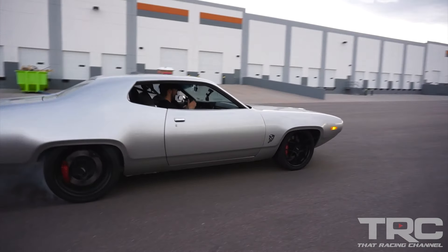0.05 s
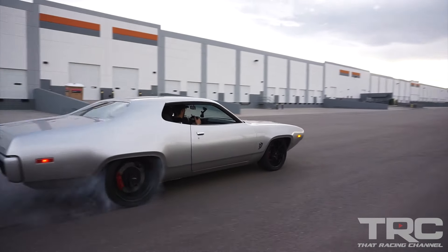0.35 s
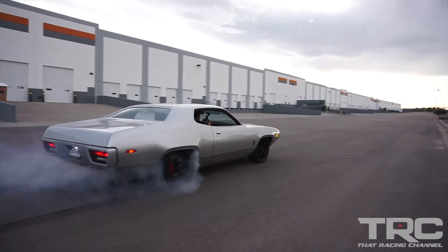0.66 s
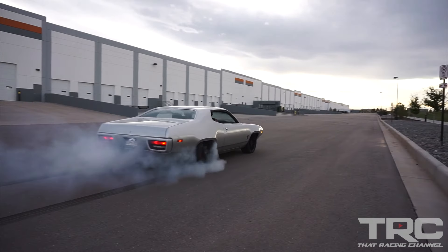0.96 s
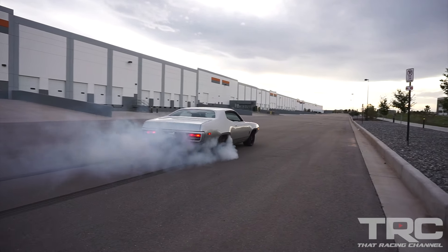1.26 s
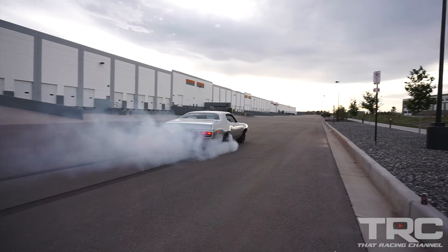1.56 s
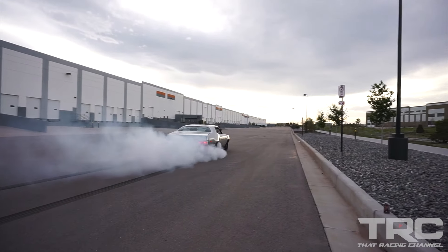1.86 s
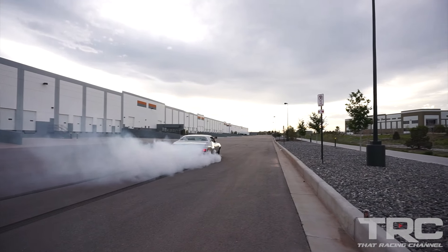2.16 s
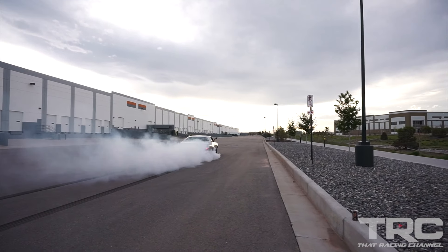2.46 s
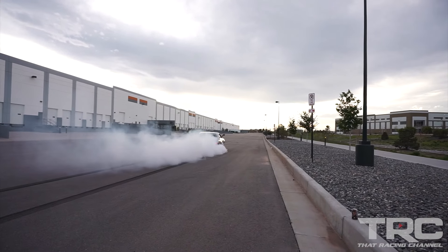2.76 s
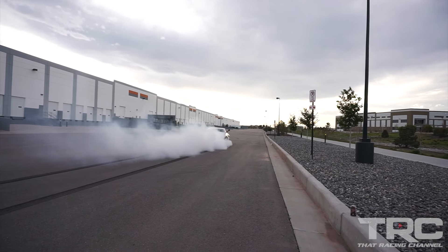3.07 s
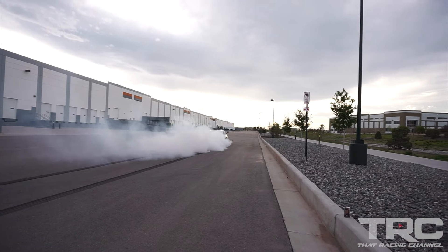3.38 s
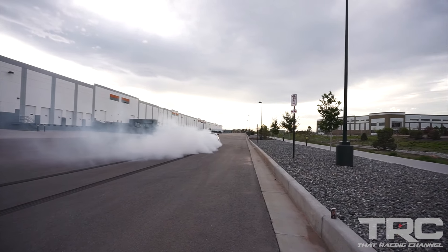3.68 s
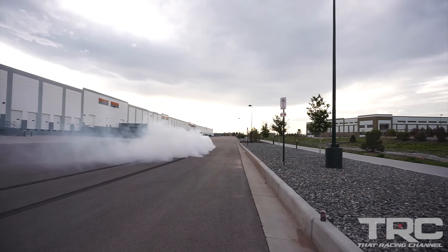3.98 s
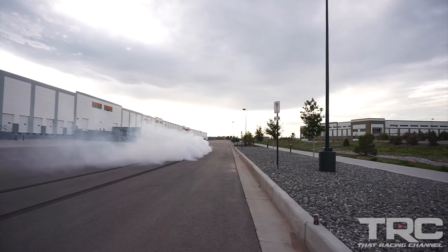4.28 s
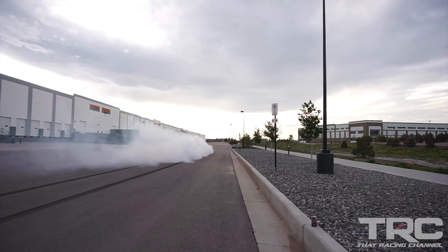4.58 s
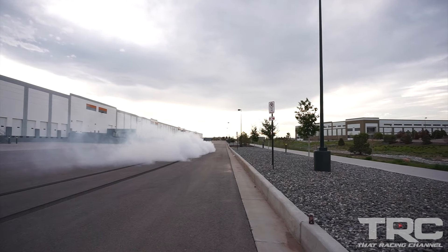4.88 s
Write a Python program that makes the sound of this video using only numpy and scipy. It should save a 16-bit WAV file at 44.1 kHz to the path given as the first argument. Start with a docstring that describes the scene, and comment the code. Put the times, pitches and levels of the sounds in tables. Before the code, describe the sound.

High tire squeal from a rolling burnout stutters, softens with distance, screeches again and stops, over a faint engine and small wind puffs.

```python
"""Rolling burnout on an open lot.

A car passes and moves away beside a long warehouse wall. Its spinning tyres scrub the asphalt, and
stick-slip friction makes them sing near 1.8 kHz; now and then the tread locks into a loud screech.
The engine's firing note is faint underneath, and turbulent puffs of wind buffet the microphone."""
import sys
import numpy as np
from scipy import signal
from scipy.fft import rfft, irfft
from scipy.io import wavfile
from scipy.ndimage import uniform_filter1d, minimum_filter1d, map_coordinates

SR = 44100
rng = np.random.default_rng(int(sys.argv[2]) if len(sys.argv) > 2 else 0)


def waveform_to_disk(signal):
    """Save audio, clipped to [-1, 1], as 16-bit WAV at the path in sys.argv[1]."""
    frames = np.transpose(np.atleast_2d(signal))
    scaled = np.clip(frames, -1, 1) * 32767
    samples = np.round(scaled).astype(np.int16)
    wavfile.write(sys.argv[1], SR, samples)


N = 222130
T = np.arange(N) / SR
HZ = np.fft.rfftfreq(N, 1 / SR)


def gain_of(db):
    """Amplitude ratio of a level in decibels."""
    return 10 ** (np.asarray(db) / 20)


def unit_rms(x):
    """Normalisation to unit mean power."""
    return x / np.sqrt(np.mean(abs(x) ** 2) + 1e-20)


def curve(rows):
    """Linear interpolation of each column over time."""
    times, *columns = np.transpose(rows)
    return [np.interp(T, times, c) for c in columns]


def spectrum(rows):
    """Interpolation of each column over log frequency."""
    hz, *columns = np.transpose(rows)
    return [np.interp(np.log(HZ + 1), np.log(hz), c) for c in columns]


def wander(rate_hz):
    """Low-pass Gaussian fluctuation of unit rms."""
    return unit_rms(irfft(rfft(rng.standard_normal(N)) * np.exp(-(HZ / rate_hz) ** 2), N))


def phase_of(hz):
    """Phase as the integral of frequency."""
    return 2 * np.pi * np.cumsum(hz) / SR


def panned(balance_db):
    """Constant-power gains for a left-minus-right level difference."""
    gains = gain_of(np.array([balance_db, -balance_db]) / 2)
    return gains / np.sqrt(np.mean(gains ** 2, axis=0))


def port_noise(colour, ports):
    """Partial coherence: spectra of one coloured noise at the two microphone ports."""
    coherence, lead, balance = spectrum(ports)
    coherence = np.clip(coherence, 0, 1)
    left, independent = rfft(rng.standard_normal((2, N)))
    right = (coherence * left + np.sqrt(1 - coherence ** 2) * independent) * np.exp(-1j * lead)
    return np.array([left, right]) * panned(balance) * gain_of(spectrum(colour)[0])


def puff_envelope(start_s, decay_s, attack_s=.004):
    """A pressure transient: linear rise, exponential decay."""
    rise = np.clip((T - start_s) / attack_s + 1, 0, 1)
    return rise * np.exp(-np.maximum(T - start_s - attack_s, 0) / decay_s)


# Strong eddies: start_s, level_db, decay_s
STRONG_PUFFS = [(1.611, -30, .011), (1.677, -30.5, .016), (2.428, -23, .009), (2.571, -21, .011),
                (2.605, -32, .025), (3.028, -20.5, .012), (3.061, -23, .009), (3.751, -21, .006),
                (3.78, -36, .05), (4.332, -35, .016), (4.383, -33, .02), (4.535, -27, .012),
                (4.766, -27.5, .008)]

def puffs(flow_db, wake_db=-18, wake_s=.055, flurries_per_s=9, flurry_s=.009):
    """Intermittency of turbulence: the envelope of strong puffs, their wakes and random flurries."""
    strong = sum(gain_of(db) * np.hypot(puff_envelope(s, decay),
                                        gain_of(wake_db) * puff_envelope(s, wake_s))
                 for s, db, decay in STRONG_PUFFS)
    flurries = sum(puff_envelope(s, flurry_s) for s in T[rng.random(N) < flurries_per_s / SR])
    return strong + flurries * gain_of(np.minimum(flow_db, -44) + 5)  # capped: clearest in light wind


# Steady airflow: time_s, relative_level_db
AIRFLOW = [(0, -71), (1, -58), (1.55, -56), (1.9, -64), (2.3, -61), (2.7, -47), (4.25, -45), (4.45, -36.5),
           (4.73, -40.5), (4.93, -25.5), (5.04, -36)]
# Buffeting spectrum: frequency_hz, relative_density_db
BUFFET_COLOUR = [(20, -32), (50, -17), (100, -3.5), (200, 0.5), (330, 0.5), (550, -4.5), (800, -10.5),
                 (1300, -21), (2500, -41), (5000, -63), (10000, -72)]
# Wind at the two ports: frequency_hz, coherence, left_lead_rad, balance_db
WIND_COHERENCE = [(50, 1, 0.42, -3), (150, 1, 1.05, -1), (307, 0.6, 1.76, 0), (806, 0.58, 2.5, -0.5),
                  (3000, .2, 1.4, 2)]

def wind(lumpy_db=2.5, snap_hz=340, crackle_db=2):
    """Turbulent pressure: eddies break on the ports, the puffs brighter than the steady flow."""
    flow_db = curve(AIRFLOW)[0]
    flow = unit_rms(irfft(port_noise(BUFFET_COLOUR, WIND_COHERENCE), N) * gain_of(lumpy_db * wander(40)))
    eddies = irfft(port_noise(BUFFET_COLOUR, WIND_COHERENCE) * HZ / np.hypot(HZ, snap_hz), N)
    eddies *= gain_of(crackle_db * wander(150))
    eddies /= np.sqrt(uniform_filter1d((eddies ** 2).mean(0), size=500))
    air = flow * gain_of(flow_db - 1) + eddies * puffs(flow_db)
    return signal.sosfilt(signal.butter(2, 45, "highpass", fs=SR, output="sos"), air)


# Engine running: time_s, firing_rate_hz, relative_level_db
FIRING = [(0, 205, -59.5), (.55, 200, -62), (.85, 216, -50.5), (1.2, 222, -57.5), (2.2, 215, -62),
          (3.6, 212, -49.5), (5.04, 205, -58)]
# Exhaust spectrum: frequency_hz, relative_density_db
EXHAUST_COLOUR = [(25, -45.5), (60, -25), (120, 0), (220, 11), (330, 7.5), (480, -17.5), (900, -42.5)]
# Exhaust and tyre noise at the two ports: frequency_hz, coherence, left_lead_rad, balance_db
CAR_COHERENCE = [(600, .88, -.2, 1.5), (1780, 1, -.35, .5), (3500, .78, .5, 3), (5000, .65, .4, 9.5),
                 (7000, .6, .1, 4.5), (10000, .55, .1, 8)]

def engine(note_db=-5, orders_db=-11):
    """Periodic firing: eight cylinders, four a revolution, give a note and crank orders in rumble."""
    hz, level = curve(FIRING)
    phase = phase_of(hz * (1 + .021 * wander(22)))
    orders = sum(np.cos(k * phase / 4 + wander(12)) for k in range(2, 9))
    note = unit_rms(np.cos(phase) + gain_of(orders_db) * orders)
    rumble = unit_rms(irfft(port_noise(EXHAUST_COLOUR, CAR_COHERENCE), N))
    return (rumble + gain_of(note_db) * note) * gain_of(level)


# Scrubbing effort, with wheelspin ending near 4.3 s: time_s, effort_db
SCRUB_EFFORT = [(0, -2.5), (.33, 2), (.58, -3), (.98, 1), (1.4, -1.3), (2.9, .3), (3.35, -2), (3.85, -1),
                (4.05, -4), (4.25, -5), (4.38, -13), (5.04, -11)]
# Friction spectrum: frequency_hz, relative_density_db
FRICTION_COLOUR = [(30, -70.5), (200, -50), (490, -22), (570, -7), (800, -6), (1100, -2), (1550, 0.5),
                   (2300, 0.5), (2800, -2), (3700, -5.5), (4600, -10), (6500, -17.5), (11000, -24)]
# Its peaks and hollows: centre_hz, width_hz, gain_db
FRICTION_RIPPLE = [(1130, 80, 3), (1330, 70, -4), (2180, 90, -5), (2420, 130, 2), (2800, 130, -3),
                   (3150, 160, 2), (4400, 160, -2), (5200, 450, -1.5)]
# Bands of rub, rasp and sizzle: low_hz, high_hz
FRICTION_BANDS = [(750, 1250), (2400, 2950), (5800, 10500)]
# Strength of each band: level_db, growth_db_per_effort_db, loss_db_per_s
FRICTION_LEVELS = [(-39.8, 1.2, 0), (-34.3, .8, 6.1), (-38.7, 1.3, 10.2)]

def scrubbing(recede_s=1.55, grit_db=1, flutter_db=.93):
    """Sliding friction: torn rubber and grit hiss; distance and smoke attenuate the treble first."""
    ripple = sum(db * np.exp(-.5 * ((HZ - hz) / width) ** 2) for hz, width, db in FRICTION_RIPPLE)
    noise = port_noise(FRICTION_COLOUR, CAR_COHERENCE) * gain_of(ripple)
    centres = np.log(FRICTION_BANDS).mean(1)
    effort = curve(SCRUB_EFFORT)[0]
    receding_s = np.maximum(T - recede_s, 0)
    hiss = np.zeros((2, N))
    for (low, high), (db, growth, loss), share in zip(FRICTION_BANDS, FRICTION_LEVELS, np.eye(3)):
        level = db + growth * effort - loss * receding_s
        band_rms = irfft(noise * ((HZ > low) & (HZ < high)), N).std()
        crossover = np.interp(np.log(HZ + 1), centres, share)
        hiss += irfft(noise * crossover, N) / band_rms * gain_of(level)
    return hiss * gain_of(grit_db * wander(230) + flutter_db * wander(36))


def resonance(width_hz, hold_s=.032):
    """Random excitation: the complex envelope of a resonance, whose bandwidth grows as it runs faster."""
    step = 1 / 32
    clock = np.cumsum(width_hz * np.ones(N)) / SR
    kicks = rng.standard_normal((N, 2)) @ [1, 1j]
    poles = np.full(3, np.exp(-np.pi * step))
    ring = unit_rms(signal.lfilter([1], np.poly(poles), kicks))
    ring = np.interp(clock / step + 500, np.arange(N), ring)
    # friction limits the swing, steadying the loudness
    window = np.exp(-np.linspace(-2, 2, round(hold_s * 2 * SR)) ** 2)
    return unit_rms(ring / np.sqrt(signal.fftconvolve(abs(ring) ** 2, window, "same")))


# Left-minus-right level of the squeal: time_s, balance_db
SQUEAL_BALANCE = [(0, 7.5), (.48, 7), (.8, 1.5), (3.4, .5), (3.56, -2.5), (4.3, 0), (4.37, 16), (4.58, 15),
                  (4.85, 2)]

def at_ports(tone, lead_rad, balance_share=1):
    """Phase and level differences turn a complex tone into a stereo pair of equal mean power."""
    pair = np.sqrt(2) * np.array([tone, tone * np.exp(-1j * lead_rad)]).real
    return pair * panned(balance_share * curve(SQUEAL_BALANCE)[0])


# Weaker resonance of the tread: time_s, pitch_hz, relative_level_db
SECOND_MODE = [(.1, 2020, -48), (.33, 2093, -23), (.8, 2180, -28.5), (1.4, 2120, -37), (1.6, 1650, -39),
               (2.9, 1497, -33), (3.2, 1440, -42), (4, 1447, -46), (4.4, 1450, -66)]

def second_voice():
    """Beating: another part of the tread sings against the main note, first above it, then below."""
    hz, level = curve(SECOND_MODE)
    tone = resonance(width_hz=240) * np.exp(1j * phase_of(hz))
    return at_ports(tone, lead_rad=-.2) * gain_of(level - 1)


# Main stick-slip resonance: time_s, pitch_hz, relative_level_db
MAIN_MODE = [(0, 1700, -25), (.5, 1870, -26.5), (.72, 1950, -24.5), (.95, 1965, -20), (1.4, 1940, -21.2),
             (1.8, 1875, -22), (2.08, 1840, -28), (2.52, 1830, -27.7), (2.8, 1710, -31.5),
             (3.2, 1815, -28.3), (3.45, 1770, -29), (3.65, 1730, -26), (3.98, 1670, -23),
             (4.33, 1715, -29.5), (4.55, 1715, -31.5), (4.68, 1715, -46), (5.04, 1740, -55)]
# Its bandwidth, narrow when the blocks slip in step: time_s, width_hz
MODE_WIDTH = [(0, 480), (.5, 400), (.85, 280), (2.7, 455), (3.7, 280), (4.4, 170), (5, 260)]

def singing(octave_db=-22, flutter_db=2):
    """Incoherent stick-slip: many tread blocks slip out of step and feed one gliding resonance."""
    hz, level = curve(MAIN_MODE)
    tone = resonance(curve(MODE_WIDTH)[0]) * np.exp(1j * phase_of(hz))
    tone *= gain_of(flutter_db * wander(40))
    tone = unit_rms(tone) + gain_of(octave_db) * unit_rms(tone ** 2)
    return at_ports(tone, lead_rad=-.31) * gain_of(level - 3)


# Spectrum of tearing rubber: frequency_hz, relative_density_db
TEARING_COLOUR = [(700, -40), (1300, -12), (1600, -2), (2100, 0), (2700, -11), (3800, -10), (4500, -26),
                  (7000, -45), (11000, -70)]

def tearing(envelope, treble_db):
    """Fracture noise: rubber tears while the tread holds, a rasp on each screech, weaker far away."""
    rasp = unit_rms(irfft(port_noise(TEARING_COLOUR, CAR_COHERENCE), N))
    return rasp * envelope * gain_of(-17 + .8 * treble_db)


# One screech a row: start_s, end_s, relative_level_db, pitch_hz, glide_hz, relative_octave_db
TREAD_GRABS = [(0, .045, -15.5, 1632, 80, -16), (.056, .215, -15.3, 1720, 15, -9),
               (.259, .303, -15.4, 1695, -50, -5), (.315, .456, -16.2, 1785, 20, -4.5),
               (.464, .506, -14, 1771, -15, -3.5), (.566, .587, -16, 1900, 110, -4.5),
               (.634, .658, -13.8, 1890, 100, -10), (.775, .802, -14.2, 1990, -45, -19),
               (.954, .988, -17.5, 1920, 65, -24), (1.018, 1.074, -17, 1940, 0, -14),
               (1.27, 1.306, -15.5, 1900, 10, -15), (1.424, 1.442, -12, 1935, 70, -24),
               (3.541, 3.645, -18.6, 1690, 0, -12), (3.98, 4.009, -15, 1655, -20, -21),
               (4.022, 4.097, -14.5, 1638, 0, -15), (4.156, 4.177, -23.5, 1726, 0, -6),
               (4.199, 4.299, -18, 1640, -90, -12)]

def grip(attack_s=.011, release_s=.007, surge_hz=26.5, slack_depth=.55, pitch_lift=.02):
    """Modulation by grip: each screech surges evenly, weaker and sharper as the grip slackens."""
    envelope, slack, knots = np.zeros(N), np.zeros(N), []
    for start, end, db, hz, glide, octave_db in TREAD_GRABS:
        surges = max(round((end - start) * surge_hz), 1)
        turns = np.clip(surges * (T - start) / (end - start), .5, surges - .5)
        slack += np.cos(np.pi * turns) ** 8
        rise = np.clip((T - start) / attack_s + .5, 0, 1)
        release = np.clip((end - T) / release_s + .5, 0, 1)
        envelope += gain_of(db) * rise * release
        knots += [(start, hz - glide / 2, octave_db), (end, hz + glide / 2, octave_db)]
    hz, octave_db = curve(knots)
    return envelope * (1 - slack_depth * slack), hz * (1 + pitch_lift * slack), octave_db


# Screech timbre as the distance changes: time_s, rasp_share, treble_gain_db, fuzz_db
SCREECH_TIMBRE = [(0, .032, 0, -1), (.4, .05, 0, -4), (.65, .058, 2.5, 0), (1.4, .03, -3, -2),
                  (4.3, .02, -6.5, 0)]

def screeches(jitter=.016, throb_db=1.4, block_hz=310, block_depth=.08, ribs_db=-9):
    """Self-excited oscillation: the tread locks into one harmonic tone, roughened by passing blocks."""
    envelope, hz, octave_db = grip()
    rasp, treble_db, fuzz_db = curve(SCREECH_TIMBRE)
    block_phase = phase_of(block_hz * (1 + .12 * wander(78.9)))
    phase = phase_of(hz * (1 + jitter * wander(82.3)))
    # single slips come early or late without moving the pitch
    slip = rasp * hz / block_hz * wander(450)
    # the swing sags at times but cannot outgrow the rubber's grip
    sag = gain_of(-throb_db * wander(55) ** 2)
    swing = unit_rms(sag * (1 + block_depth * np.cos(block_phase)))
    # neighbouring ribs sing slightly apart and beat
    ribs = unit_rms(1 + gain_of(ribs_db) * resonance(width_hz=300))
    tone = at_ports(ribs * np.exp(1j * (phase + slip)), lead_rad=-.3)
    fuzz = gain_of(fuzz_db)
    for k, db in [(2, treble_db / 2), (3, treble_db - 15), (4, 2 * treble_db - 21)]:
        # a clean core in a fuzz from blocks that fall out of step
        body = (1 + fuzz * resonance(width_hz=270 * k)) / np.hypot(1, fuzz)
        overtone = at_ports(body * np.exp(1j * k * phase), lead_rad=.5, balance_share=.5)
        tone += gain_of(octave_db + db) * overtone
    return swing * (tone * envelope * gain_of(.9) + tearing(envelope, treble_db))


def lot_reflections(x, wet_db=-20.5, t60_s=.68, first_s=.023, echoes_per_s=1500):
    """Reverberation: wall and asphalt scatter a thin, exponentially decaying tail."""
    t = T[:SR]
    taps = rng.standard_normal((2, SR)) * (rng.random((2, SR)) < echoes_per_s / SR)
    taps *= gain_of(-60 * t / t60_s) * (t > first_s)
    tail = signal.lfilter(*signal.butter(1, 3000, fs=SR), taps)
    tail /= np.linalg.norm(tail, axis=1, keepdims=True)
    return x + gain_of(wet_db) * signal.fftconvolve(x, tail, axes=1)[:, :N]


def near_echoes(x, wet=.24):
    """Interference: reflections within milliseconds put steady peaks and notches in the treble."""
    lag = np.arange(400)
    taps = rng.standard_normal(400) * np.exp(-lag / 150) * (lag > 40)
    taps = signal.lfilter(*signal.butter(2, 3000, "highpass", fs=SR), taps)
    return x + wet * signal.oaconvolve(x, taps[None] / np.linalg.norm(taps), axes=1)[:, :N]


# The car swings from the left to straight ahead: time_s, right_lag_s
ARRIVAL_LAG = [(0, .00007), (.35, .00006), (.75, .00002), (1.6, 0)]

def from_the_left(pair):
    """Path difference: sound from the left reaches the right port later."""
    late = map_coordinates(pair[1], [(T - curve(ARRIVAL_LAG)[0]) * SR], order=3, mode="nearest")
    return np.array([pair[0], late])


def scene():
    """Superposition of tyres, their reflections, engine and wind."""
    squeal = singing() + second_voice() + screeches()
    car = lot_reflections(squeal) + near_echoes(scrubbing()) + engine()
    return from_the_left(car) + wind()


def record(dry):
    """Peak limiting holds down the loudest moments; a low-pass filter bounds the band."""
    ceiling, cutoff_hz = .62, 11120
    peak = -minimum_filter1d(-abs(dry).max(0), size=301)
    limited = dry / uniform_filter1d(np.maximum(peak / ceiling, 1), size=301)
    lowpass = signal.firwin(801, cutoff_hz, window=("kaiser", 9), fs=SR)
    return signal.oaconvolve(limited, lowpass[None], "same")


dry = scene()
out = record(dry)
waveform_to_disk(out)
```